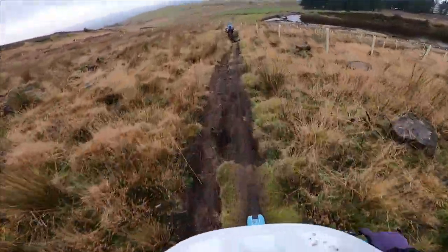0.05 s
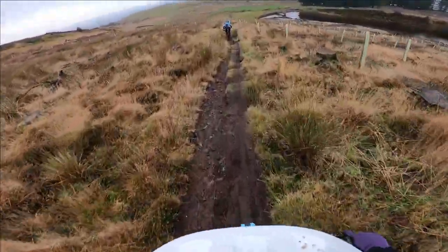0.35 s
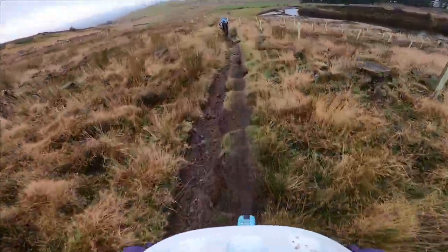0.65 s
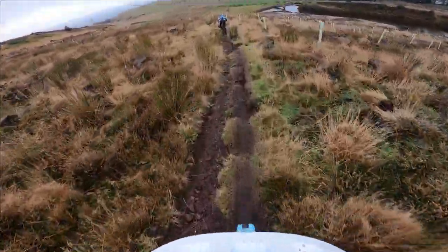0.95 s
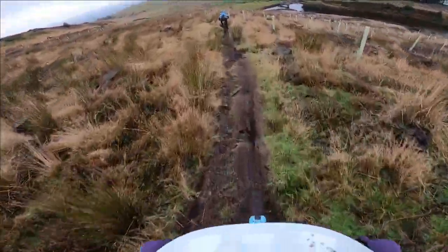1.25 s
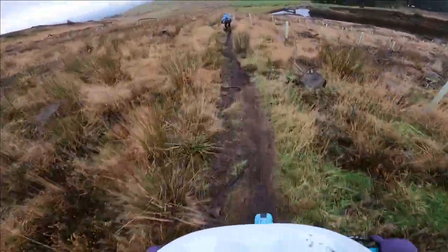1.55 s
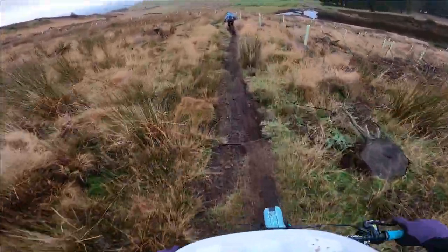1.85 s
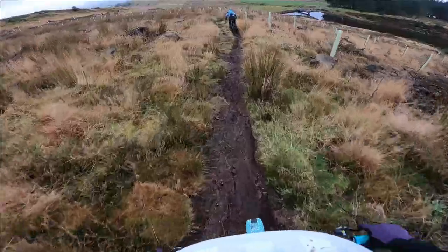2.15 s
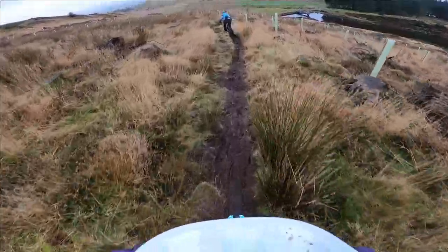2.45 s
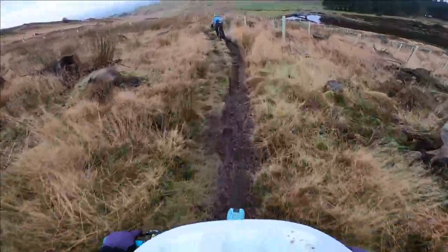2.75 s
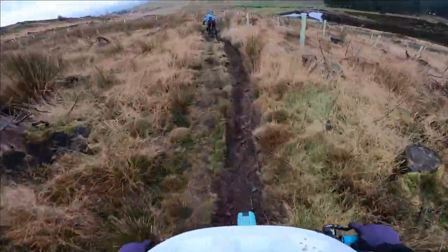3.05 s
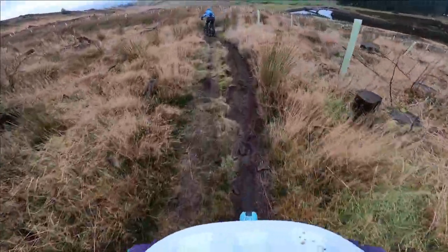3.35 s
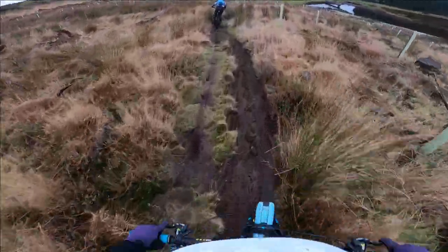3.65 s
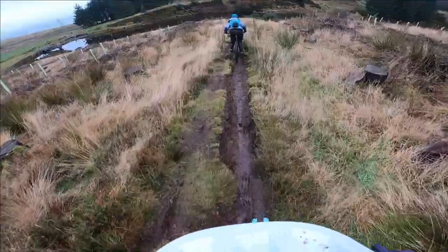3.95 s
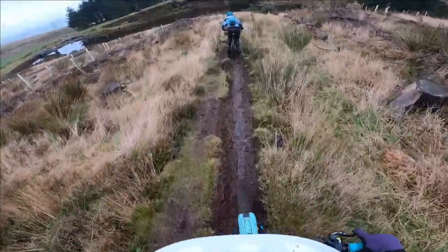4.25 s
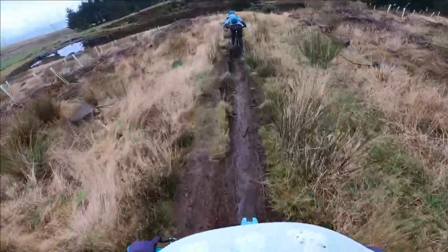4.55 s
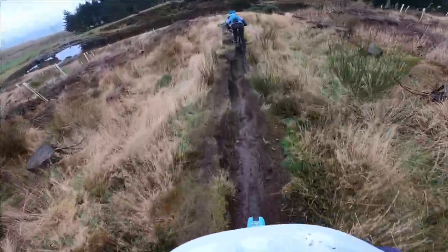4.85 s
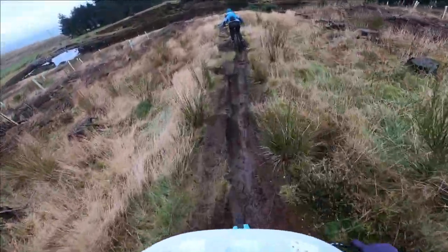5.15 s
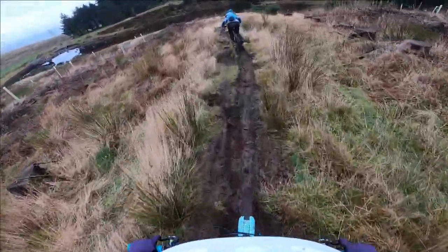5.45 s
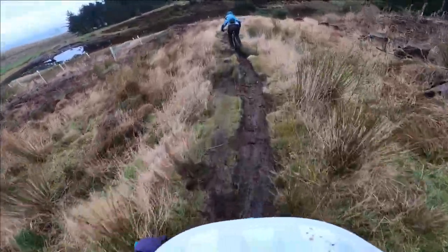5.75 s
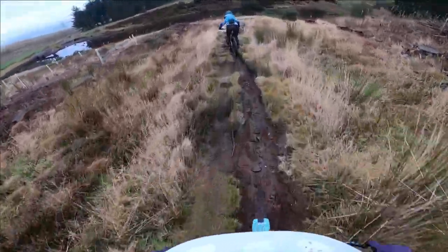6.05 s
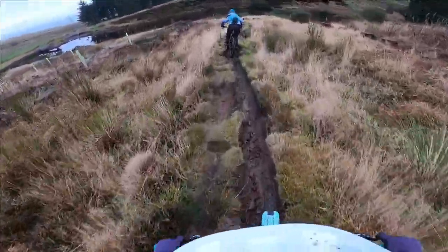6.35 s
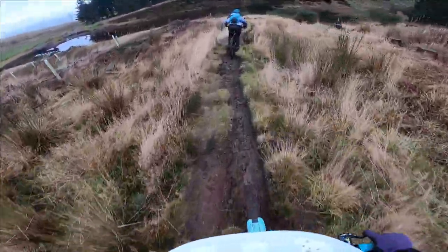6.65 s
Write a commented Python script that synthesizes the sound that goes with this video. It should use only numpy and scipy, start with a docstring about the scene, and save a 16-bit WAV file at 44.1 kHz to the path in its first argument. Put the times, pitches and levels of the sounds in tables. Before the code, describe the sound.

Wind rumbles and buffets the microphone as a mountain bike rolls down a muddy trail, its chain clattering and tyres squelching.

```python
"""Wind rumbles, buffets and pops at a rider's helmet as a mountain bike runs down a muddy, grassy rut.
Turbulent eddies press on the microphone, over faint tyre noise and the odd clatter of the chain, whose
impacts excite the modes of the bike. With a click, the sound cuts to a wetter, slower stretch: the wind
is weaker, air pockets burst and ring in the mud under the tread, spray hisses and the bike rattles on.
In brief spells of coasting the freewheel's pawls buzz over their ratchet."""
import sys
import numpy as np
from scipy import signal
from scipy.fft import rfft, irfft, next_fast_len
from scipy.io import wavfile
from scipy.ndimage import uniform_filter1d, minimum_filter1d

SR = 44100
rng = np.random.default_rng(int(sys.argv[2]) if len(sys.argv) > 2 else 0)


def output_pcm(signal):
    """Save a mono or channel-first signal as 16-bit PCM at the path in sys.argv[1].

    Samples are clipped to [-1, 1] before scaling.
    """
    pcm = np.clip(np.atleast_2d(signal).T, -1, 1) * 32767
    wavfile.write(sys.argv[1], SR, np.round(pcm).astype(np.int16))


N = 304290
TIME = np.arange(N) / SR
CUT_S = 3.853   # the sound cuts from the firm stretch to the wet one

# Envelopes of the large, middling (airflow) and small eddies: [t/s, relative level/dB]
RUMBLE_LEVEL = [(0, -10.5), (0.7, -13), (2.22, -9.5), (2.28, -21), (2.33, -11.5), (2.5, -6), (2.65, -9.5),
                (3.55, -13.5), (3.82, -9), (3.87, -18.5), (3.98, -26), (4.08, -16.5), (4.42, -20.5),
                (4.57, -13), (4.8, -18.5), (5.28, -19.5), (5.42, -13), (5.65, -16.5), (5.95, -13.5),
                (6.9, -17)]
AIRFLOW_LEVEL = [(0, -9.5), (0.06, -21), (0.14, -13.5), (0.66, -13.5), (0.73, -19), (0.8, -13.5),
                 (2.15, -13.5), (2.28, -26.5), (2.42, -31.5), (2.51, -8.5), (2.66, -18), (2.78, -10),
                 (2.94, -24), (3.04, -12.5), (3.1, -29), (3.15, -14.5), (3.3, -13.5), (3.65, -11.5),
                 (3.72, -19), (3.81, -14), (3.87, -34), (4.02, -33), (4.1, -20), (4.21, -17), (4.29, -34),
                 (4.44, -33), (4.53, -20), (4.82, -37.5), (5.2, -36), (5.39, -18), (5.46, -33), (5.63, -25),
                 (5.78, -31.5), (5.86, -15), (6.12, -14), (6.18, -21), (6.32, -18.5), (6.38, -25),
                 (6.45, -13.5), (6.58, -37), (6.66, -15), (6.9, -13.5)]
FLUTTER_LEVEL = [(0, -29), (0.8, -25), (1.35, -21), (1.7, -20), (2.1, -29.5), (2.6, -30.5), (3.18, -26.5),
                 (3.3, -16.5), (3.42, -24), (3.56, -23.5), (4.2, -27.5), (6.9, -30)]
# Spectra of the same three sizes of eddy: [f/Hz, relative level/dB]
RUMBLE_SPECTRUM = [(15, -20.5), (28, 0.5), (45, 2), (80, 3.5), (120, 0), (180, -8.5), (300, -25),
                   (600, -58)]
BUFFET_SPECTRUM = [(70, -27.5), (140, -3), (230, -0.5), (350, -4.5), (480, -9.5), (700, -21.5),
                   (1100, -33.5)]
FLUTTER_SPECTRUM = [(280, -17.5), (450, -7), (620, 0), (850, -5.5), (1150, -13.5), (1600, -23), (2400, -30)]
# Pops of air in the microphone port: [t/s, peak level/dB, relative snap level/dB]
PORT_POPS = [(0.289, -5, -36), (0.569, -8, -40), (0.81, -13, -42), (0.957, -4, -37), (1.029, -10, -38),
             (1.157, -5, -29), (1.183, -2.5, -29), (1.199, -3, -13), (1.298, -4, -39), (1.309, -4, -19),
             (1.348, -4, -32), (1.392, 0, -43), (1.654, -9.5, -36), (1.771, -4, -41), (1.913, -9, -20),
             (2.06, -11.5, -36), (2.113, -7, -40), (3.195, -3.5, 5), (3.238, -17, -27), (3.307, -3.5, -15),
             (4.182, -10, -40), (5.869, -8, -40), (5.998, -13, -37), (6.115, -5.5, -31)]
# Big bumps that throw the chain about: [t/s, relative peak level/dB, centre f/Hz, duration/s]
BIG_BUMPS = [(0.4194, -19.5, 2100, 0.048), (0.713, -20.5, 1830, 0.08), (0.903, -18, 2460, 0.032),
             (1.152, -23, 2400, 0.03), (1.447, -17, 2220, 0.02), (1.659, -22, 1700, 0.022),
             (1.841, -22, 1690, 0.028), (2.226, -21, 2220, 0.018), (2.352, -15, 2450, 0.0092),
             (2.532, -14.5, 2600, 0.011), (2.5963, -9.5, 2160, 0.022), (2.772, -11.5, 2170, 0.011),
             (2.9035, -17.5, 2280, 0.18), (3.0907, -8, 2030, 0.019), (3.44, -13.5, 1940, 0.03),
             (3.645, -13.5, 2660, 0.01), (3.726, -18.5, 4000, 0.018), (3.7526, -19.5, 4500, 0.03),
             (3.927, -10.5, 2200, 0.049), (4.261, -7.5, 3130, 0.035), (4.336, -10.5, 2780, 0.032),
             (4.387, -8, 2300, 0.013), (4.425, -6, 2460, 0.034), (4.485, -10, 2060, 0.018),
             (4.546, -7.5, 3000, 0.032), (4.6, -7.5, 2360, 0.0098), (4.6745, -12.5, 2960, 0.018),
             (4.756, -8.5, 2300, 0.07), (4.8347, -9, 3500, 0.016), (4.861, -13, 3540, 0.0076),
             (4.9587, -7, 3240, 0.062), (5.0825, -6.5, 3050, 0.08), (5.164, -9, 2970, 0.019),
             (5.208, -10, 2900, 0.094), (5.365, -5.5, 2300, 0.04), (5.47, -9, 2180, 0.024),
             (5.606, -6, 2400, 0.03), (5.621, -7, 2300, 0.038), (5.6807, -6.5, 1920, 0.026),
             (5.7577, -7.5, 2320, 0.013), (5.816, -8, 2300, 0.034), (5.839, -10, 2700, 0.022),
             (5.889, -11, 2310, 0.018), (5.9583, -8, 1880, 0.047), (6.0696, -10.5, 1750, 0.062),
             (6.232, -10.5, 1800, 0.042), (6.253, -13, 3600, 0.055), (6.351, -12, 2500, 0.014),
             (6.407, -15.5, 2400, 0.18), (6.547, -16, 2480, 0.024)]
# Normal modes of the bike: [f/Hz, relative level/dB, T60/s]
BIKE_MODES = [(970, -7.5, 0.041), (1240, 2, 0.011), (1683, -11.5, 0.03), (2020, -20.5, 0.015),
              (2194, -6.5, 0.0061), (2484, -9.5, 0.015), (2776, -11.5, 0.014), (3365, -6.5, 0.023),
              (3950, -19, 0.0092), (4020, 2.5, 0.006), (4240, -20.5, 0.026), (5800, -6, 0.021),
              (6260, -4, 0.018), (7540, -16.5, 0.011)]
# Tyre noise on firm and on wet ground: [t/s, relative crunch level/dB, relative spray level/dB]
FIRM_GROUND = [(0.0, -44, -51), (1.02, -45, -54), (1.34, -44, -51.5), (1.68, -41, -47.5),
               (2.26, -45, -52.5), (2.52, -32, -46), (3.02, -40.5, -49), (3.19, -37.5, -56),
               (3.7, -39.5, -49)]
WET_GROUND = [(3.87, -28.5, -40), (3.94, -18.5, -27), (4.03, -25.5, -33), (4.13, -26, -31.5),
              (4.55, -27.5, -38.5), (5.01, -28.5, -38.5), (5.24, -27, -33.5), (5.86, -25, -46.5),
              (6.07, -30.5, -46), (6.38, -29, -45.5), (6.66, -33.5, -48.5), (6.9, -32, -48.5)]
# Swish of a clogged patch of tread: [t/s of one pass, rotation f/Hz, crunch swing/dB, spray swing/dB]
FIRM_SWISH = (0.41, 2.73, 0.67, 1.5)
WET_SWISH = (3.6, 2.498, 0.66, 1.8)
# Spectra of crunching mud and of spray: [f/Hz, relative level/dB]
CRUNCH_SPECTRUM = [(250, 8.5), (500, 0.5), (900, 0), (1500, 3.5), (2400, 3.5), (3500, 0.5), (4600, -6.5),
                   (6500, -27.5), (9000, -30.5)]
SPRAY_SPECTRUM = [(2500, -11.5), (4000, 2), (5200, 1.5), (7200, -2.5), (8500, -13), (10500, -20.5),
                  (13000, -29.5), (16000, -37)]
# Spells of coasting: [t/s, duration/s, relative level/dB]
COASTING = [(0.286, 0.08, -48), (1.05, 0.086, -51), (5.264, 0.14, -37)]
# Faint bright ticks: [t/s, relative peak level/dB]
FAINT_TICKS = [(0.5023, -31), (2.5017, -35)]


def wind(dip_db=1.5, dip_s=0.027, flutter_db_per_db=1.69):
    """Turbulent pressure: large eddies rumble throughout; small ones grow steeply with the airflow."""
    (rumble_db,), (flow_db,) = in_time(RUMBLE_LEVEL), in_time(AIRFLOW_LEVEL)
    (flutter_db,) = in_time(FLUTTER_LEVEL)
    swirl = drift(hz=59)
    for s, *_ in BIG_BUMPS:   # the buffeting dips briefly at each
        flow_db = flow_db - dip_db * np.maximum(1 - np.abs((TIME - s) / dip_s - .3), 0)
    flutter_db = flutter_db + flutter_db_per_db * (flow_db + 14) + 1.6 * drift(hz=6.7)
    rumble_db = rumble_db - 0.1 + 1.9 * drift(hz=12)
    buffet_db = flow_db + across_cut(firm=0.97, wet=0.0)
    rumble = from_db(rumble_db) * eddies(RUMBLE_SPECTRUM, swirl, per_s=1500, clump_db=0.4, span_s=0.048)
    buffet = from_db(buffet_db) * eddies(BUFFET_SPECTRUM, swirl, per_s=1100, clump_db=3.0, span_s=0.09)
    flutter = from_db(flutter_db) * eddies(FLUTTER_SPECTRUM, swirl, per_s=520, clump_db=4.5, span_s=0.14)
    return rumble + buffet + flutter


def eddies(spectrum, swirl, per_s, clump_db, span_s):
    """Shot noise: each eddy is one smooth pressure pulse, its strength modulated by the swirling air."""
    pulses = grains(per_s, spread_db=2.0) * from_db(clump_db * swirl)
    return steady(colour(pulses, spectrum), span_s)


def port_pops(width_s=0.0012):
    """A short pulse has a broad spectrum: tight eddies pop in the port, the tightest with a snap."""
    out, t = np.zeros(N), TIME[:SR // 30]
    for s, peak_db, snap_db in PORT_POPS:
        flap = rng.standard_normal(len(t)) * np.exp(-(t / width_s - 1) ** 2)
        snap = from_db(min(snap_db + 3.5, 6)) * unit_rms(band(flap, 1190, 2770, order=6))
        pop = unit_rms(band(flap, 350, 966, order=3)) + snap
        at = round((s - width_s / 2) * SR)
        out[at:at + len(t)] += from_db(peak_db) * pop / np.abs(pop).max()
    return out


def chain_clatter(touches_per_s=650, width_octaves=0.37, rise_s=0.0032):
    """Impact excitation: a bump sets off a dying run of chain touches that ring the bike's modes."""
    out, t = np.zeros(N + SR), TIME[:SR // 8]
    for s, peak_db, centre_hz, length_s in BIG_BUMPS + small_bumps():
        touches = (rng.random(len(t)) < touches_per_s / SR) * rng.uniform(0.42, 1, len(t))
        touches *= np.exp(-t / (length_s / 2))
        touches[0], touches[int(rise_s * SR)] = .5, 1   # a light first touch, then the full slap
        ringing = 0
        for hz, mode_db, t60 in BIKE_MODES:
            # a harder contact favours higher modes
            coupling = np.exp(-.5 * (np.log2(hz / centre_hz) / width_octaves) ** 2)
            strike = touches * rng.standard_normal(len(t))
            detuned_hz = hz * (1 + 0.037 * rng.standard_normal())
            ringing = ringing + coupling * from_db(mode_db) * ring(strike, detuned_hz, t60)
        scuff = decay(touches, tau_s=0.0007) * rng.standard_normal(len(t))
        crack = band(band(scuff, 890, 0.85 * centre_hz, order=1), 500, 5000, order=4)
        hit = unit_rms(ringing) + from_db(-2.0) * unit_rms(crack)
        at = round(s * SR)
        out[at:at + len(t)] += from_db(peak_db + 1.0) * hit / np.abs(hit).max()
    return band(out[:N], 310, 8000, order=4)


def small_bumps(per_s=5, over_crunch_db=10, centre_hz=2150, length_s=0.018):
    """A Poisson process of lesser rattles, louder on rougher ground; rows as in BIG_BUMPS."""
    crunch_db, _ = across_cut(in_time(FIRM_GROUND), in_time(WET_GROUND))
    at = np.flatnonzero(rng.random(N) < per_s / SR)
    return [(i / SR, crunch_db[i] + over_crunch_db - 0.5 * scatter,
             centre_hz * 2 ** (0.19 * hardness), length_s)
            for i, (scatter, hardness) in zip(at, rng.standard_normal((len(at), 2)))]


def tyres():
    """Many tiny impacts sum to noise: mud crunches under the tread; water and grass hiss off it."""
    levels_db = across_cut(tread_swish(FIRM_GROUND, FIRM_SWISH), tread_swish(WET_GROUND, WET_SWISH))
    crunch_db, spray_db = levels_db + 1.6 * drift(hz=27)   # patchy ground
    bite = drift(hz=45)   # the knobs grip and let go unevenly
    grit = unit_rms(grains(per_s=6000, spread_db=2.0) * from_db(2.0 * bite))
    mud = colour(grit + from_db(0.5) * squelch(bite), CRUNCH_SPECTRUM)
    droplets = grains(per_s=12000, spread_db=3.5) * from_db(2.0 * bite + 2.0 * drift(hz=78))
    spray = colour(droplets, SPRAY_SPECTRUM)
    flung = splash_envelope()   # adds in power to the tread's own noise
    mud_gain = np.hypot(from_db(crunch_db + across_cut(firm=0.0, wet=-0.98)), from_db(-16) * flung)
    spray_gain = np.hypot(from_db(spray_db + across_cut(firm=0.5, wet=0.33)), from_db(-24.5) * flung)
    rolling = from_db(-44.5) * unit_rms(band(rng.standard_normal(N), 650, 1200, order=2))
    return mud_gain * steady(mud, span_s=0.083) + spray_gain * steady(spray, span_s=0.24) + rolling


def squelch(bite, per_s=1800, t60_cycles=24.6, clump_db=3.0, sizes=22):
    """Cavity resonance: air pockets burst under the knobs and ring, each size in clumps of its own."""
    out = 0
    for hz in np.geomspace(600, 7000, sizes):
        bursts = grains(per_s / sizes * from_db(2.5 * bite), spread_db=2.0)
        bursts *= from_db(clump_db * drift(hz=19))
        out = out + np.sqrt(hz) * unit_rms(ring(bursts, hz, t60_cycles / hz))
    return unit_rms(out)


def tread_swish(ground, swish):
    """Amplitude modulation: a clogged patch swells the crunch and spray levels once a wheel turn."""
    pass_s, rotation_hz, crunch_swing_db, spray_swing_db = swish
    turn = np.cos(2 * np.pi * rotation_hz * (TIME - pass_s))
    crunch_db, spray_db = in_time(ground)
    return np.array([crunch_db + crunch_swing_db * turn, spray_db + spray_swing_db * turn])


def splash_envelope(rise_s=0.003, decay_s=0.021):
    """The mud flung up by each big bump builds quickly, then decays exponentially."""
    out, t = np.zeros(N + SR), TIME[:SR // 4]
    shape = (1 - np.exp(-t / rise_s)) * np.exp(-t / decay_s)
    for s, peak_db, _, _ in BIG_BUMPS:
        at = round(s * SR)
        out[at:at + len(t)] += from_db(peak_db) * shape
    return out[:N]


def freewheel(teeth_per_s=340):
    """A rapid impulse train is heard as a buzz: the pawls skip over the ratchet during coasting."""
    teeth_passed = np.cumsum(teeth_per_s * (1 + 0.0076 * drift(hz=14))) / SR
    ticks = np.diff(np.floor(teeth_passed), prepend=0) * rng.uniform(.3, 1, N)
    scrape = decay(ticks, tau_s=0.001) * rng.standard_normal(N)
    hub = unit_rms(band(scrape, 5650, 6800, order=3))
    gate = sum(from_db(db - 3.5) * (TIME > s) * (TIME < s + length_s) for s, length_s, db in COASTING)
    return uniform_filter1d(gate, SR // 30) * hub


def clicks(corner_hz=400):
    """Two bare impulses tick brightly; a low-passed one clicks at the cut."""
    ticks = sum(from_db(db + 10.5) * signal.unit_impulse(N, round(s * SR)) for s, db in FAINT_TICKS)
    click = from_db(-4.5) * signal.unit_impulse(N, round(CUT_S * SR))
    return ticks + decay(click, tau_s=1 / (2 * np.pi * corner_hz))


def across_cut(firm, wet):
    """A step function: the firm stretch's value before the cut, the wet one's after it."""
    return np.where(TIME < CUT_S, firm, wet)


def from_db(db):
    """Amplitude ratio of a level in decibels."""
    return 10 ** (np.asarray(db) / 20)


def unit_rms(x):
    """Normalisation to unit mean power."""
    return x / np.sqrt(np.mean(x ** 2) + 1e-20)


def in_time(rows):
    """Linear interpolation of each level column at every sample."""
    s, *columns = np.transpose(rows)
    return [np.interp(TIME, s, column) for column in columns]


def drift(hz):
    """Low-passed Gaussian noise: a fluctuation of unit power with corner frequency `hz`."""
    pole = np.exp(-16 * np.pi * hz / SR)   # runs at an eighth of the sample rate
    slow = signal.lfilter([1], [1, -2 * pole, pole * pole], rng.standard_normal(N // 8 + 4002))[4000:]
    return np.interp(np.arange(N) / 8, np.arange(len(slow)), unit_rms(slow))


def grains(per_s, spread_db):
    """Poisson impulses of either sign, many small and a few large."""
    at = np.flatnonzero(rng.random(N) < per_s / SR)
    out = np.zeros(N)
    out[at] = from_db(spread_db * np.minimum(rng.exponential(1, len(at)), 4))
    out[at] *= rng.choice([-1, 1], len(at))
    return out


def colour(x, spectrum):
    """Spectral shaping to unit power, with a steep roll-off above the last point."""
    size = next_fast_len(N + SR // 2)
    hz = np.maximum(np.arange(size // 2 + 1) * SR / size, 1)
    points_hz, points_db = np.transpose(spectrum)
    gain = from_db(np.interp(np.log(hz), np.log(points_hz), points_db)) / (1 + (hz / points_hz[-1]) ** 4)
    return unit_rms(irfft(rfft(x, size) * gain, size)[:N])


def steady(x, span_s):
    """Division by the running RMS holds the power steady and leaves the faster texture."""
    width = int(span_s * SR)
    power = uniform_filter1d(uniform_filter1d(x * x, width), width)
    return x / np.sqrt(np.abs(power) + 1e-9)


def band(x, low_hz, high_hz, order):
    """Causal band-pass filter."""
    return signal.sosfilt(signal.butter(order, [low_hz, high_hz], "band", fs=SR, output="sos"), x + 1e-18)


def ring(impulses, hz, t60):
    """Damped oscillator: each impulse starts a sine that falls 60 dB in `t60` seconds."""
    radius, angle = from_db(-60 / (t60 * SR)), 2 * np.pi * hz / SR
    feedback = [1, -2 * radius * np.cos(angle), radius * radius]
    return signal.lfilter([0, np.sin(angle)], feedback, impulses + 1e-18)


def decay(impulses, tau_s):
    """First-order relaxation: each impulse gains an exponential tail."""
    return signal.lfilter([1], [1, -np.exp(-1 / (tau_s * SR))], impulses)


def limiter(x, release_db_per_s, ahead_s):
    """Peak limiting: the gain dips just ahead of each peak over full scale, then recovers."""
    width = int(ahead_s * SR)
    over_db = 20 * np.log10(np.maximum(np.abs(x), 1))
    release_db = release_db_per_s * TIME
    cut_db = np.maximum.accumulate(over_db + release_db, axis=-1) - release_db
    return x * uniform_filter1d(minimum_filter1d(from_db(-cut_db), 2 * width), width)


def scene():
    """Superposition in one channel: wind at the helmet, the bike below it."""
    air = wind() + port_pops()
    bike = chain_clatter() + tyres() + freewheel()
    return (air + bike + clicks())[None]


def record(dry):
    """Limiting of level and bandwidth: after a quick fade-in, gusts are held down and the top is cut."""
    fade_in = np.minimum(TIME / .004, 1)
    limited = limiter(fade_in * dry * from_db(1.0), release_db_per_s=70.5, ahead_s=0.001)
    return signal.sosfilt(signal.cheby2(12, 70, 17000, fs=SR, output="sos"), limited)


dry = scene()
out = record(dry)
output_pcm(out)
```